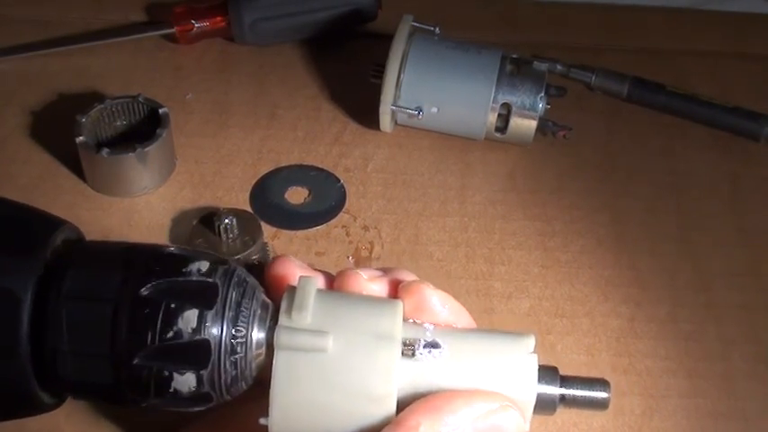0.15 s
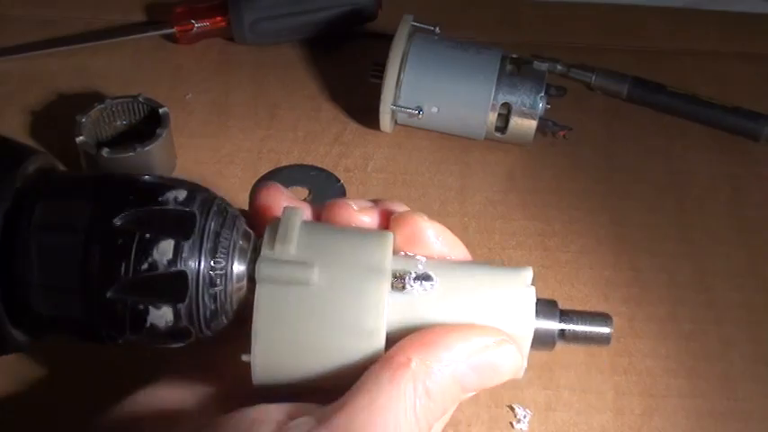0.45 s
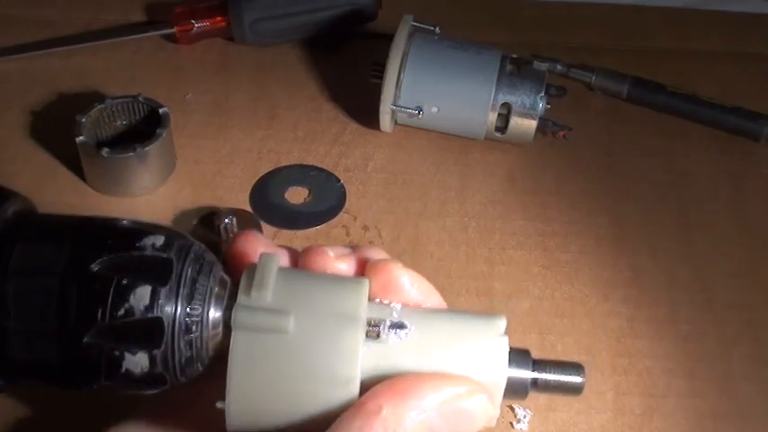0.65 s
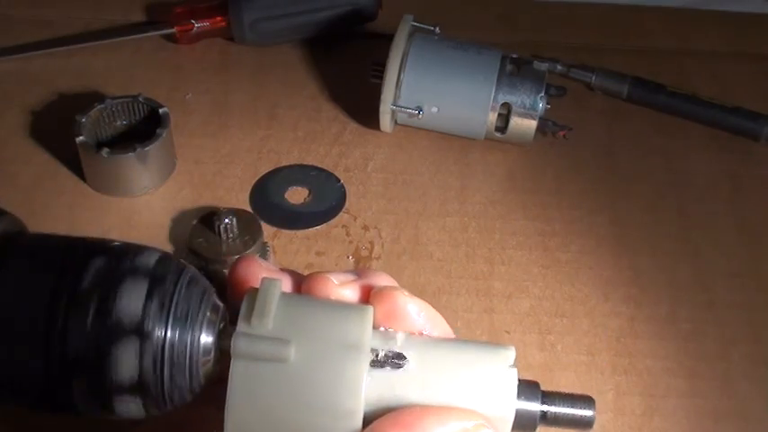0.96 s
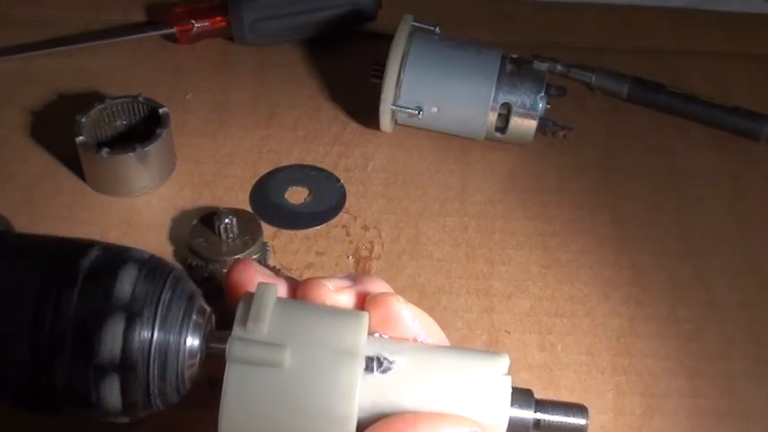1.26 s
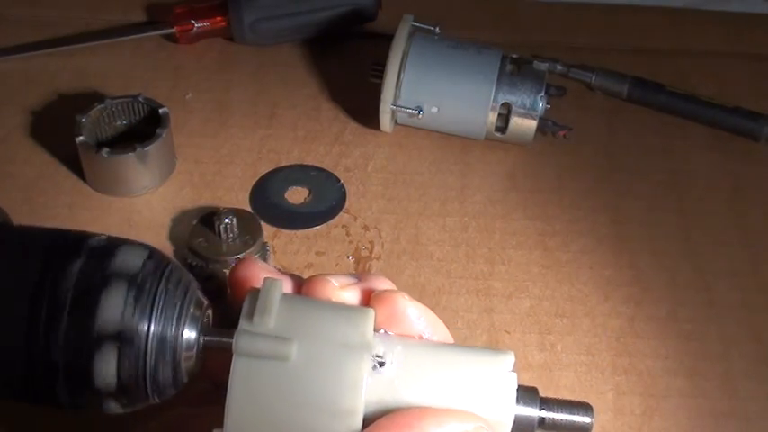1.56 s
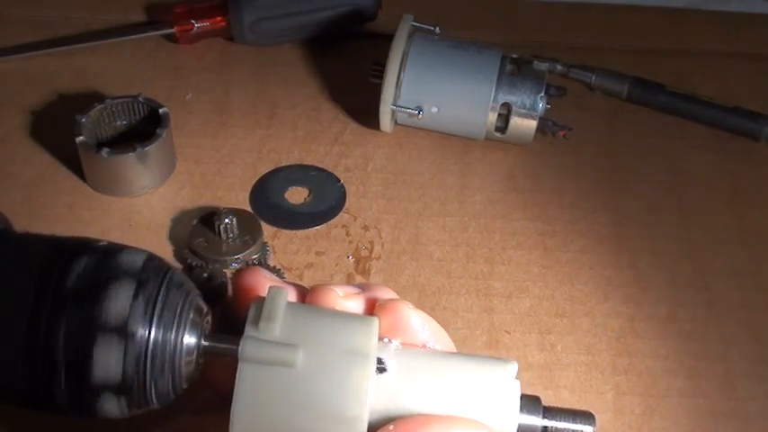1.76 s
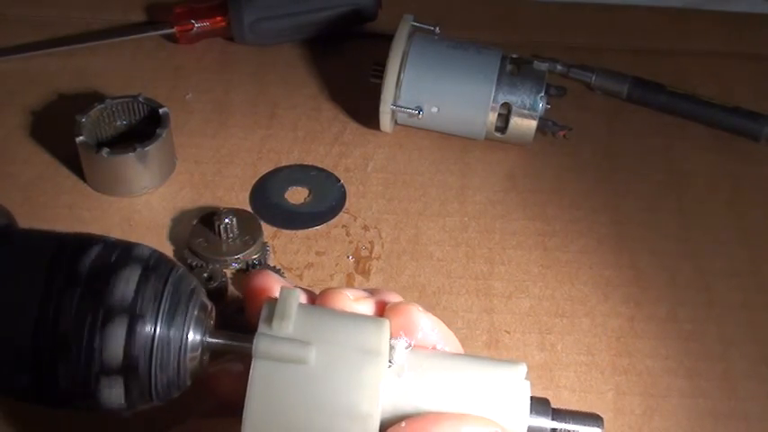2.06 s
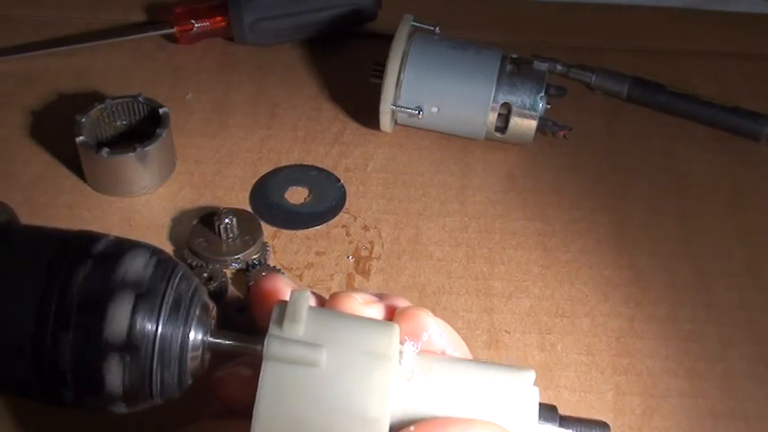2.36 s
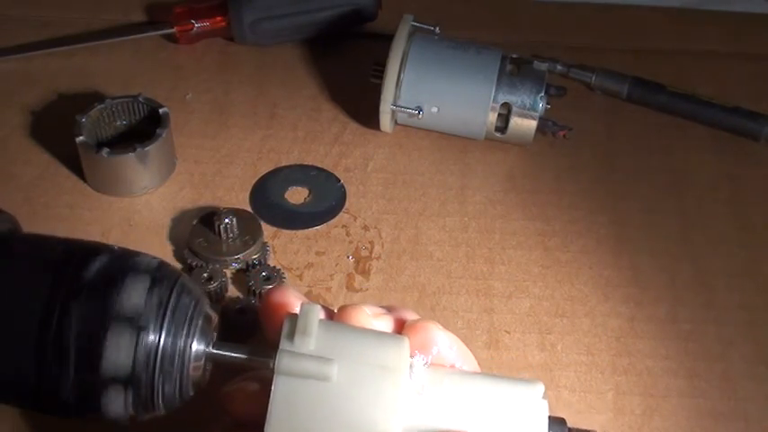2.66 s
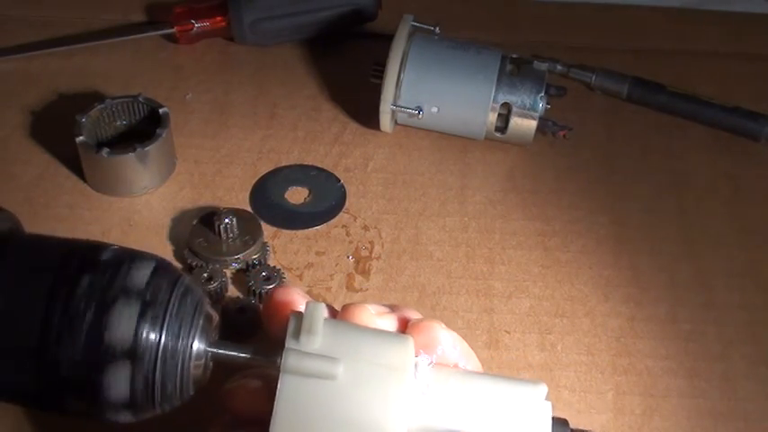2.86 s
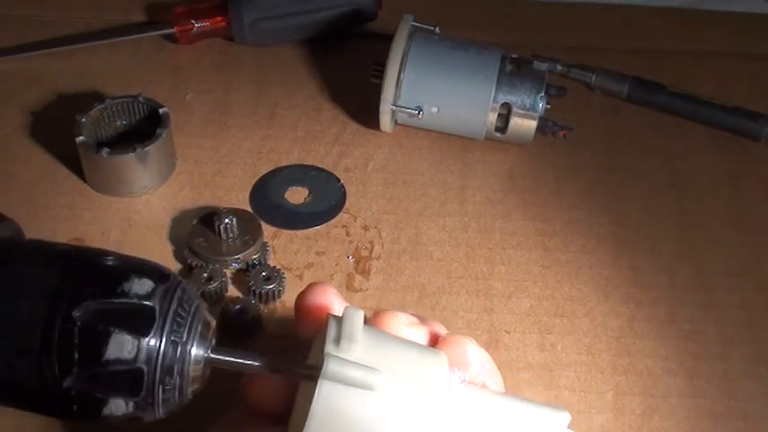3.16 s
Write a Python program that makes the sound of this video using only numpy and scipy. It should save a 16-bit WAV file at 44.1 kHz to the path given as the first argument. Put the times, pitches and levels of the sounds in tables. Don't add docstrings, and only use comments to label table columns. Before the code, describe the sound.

A cordless drill clicks, squeaks into a bright geared whine, then judders to a stop.

```python
import sys
import numpy as np
from scipy import signal
from scipy.fft import rfft, irfft
from scipy.io import wavfile

SR = 44100
rng = np.random.default_rng(int(sys.argv[2]) if len(sys.argv) > 2 else 0)


def gain_from_db(level_db):
    decades = np.asarray(level_db, float) / 20
    return 10 ** decades


def transcribe(u):
    v = np.clip(np.atleast_2d(u).T, -1, 1)
    q = np.round(v * 32767).astype(np.int16)
    wavfile.write(sys.argv[1], SR, q)


N = 145530

# f/Hz, level/dB
ROOM_TONE = [(18, -42), (30, -6), (355, 1.5), (437, 1), (569, 3), (866, -15), (1160, 0), (1500, -6.5),
             (16000, -16)]
# t/s, level/dB
RUB_LEVEL = [(0, -50), (.14, -51.5), (.23, -39.5), (.27, -43.5), (.3, -42.5), (.335, -35.5), (.37, -41.5),
             (.45, -50.5), (.5, -59), (.58, -58), (.6, -47), (.65, -60), (.7, -37)]
# f/Hz, density/dB
RUB_TONE = [(200, -19), (700, 0), (1500, -2), (3000, -4.5), (4500, -4.5), (7000, -3), (10000, -17),
            (15000, -31)]
# t/s, level/dB
CREAK_LEVEL = [(0, -64), (.31, -78), (.34, -74), (.45, -59), (.48, -75)]
# t/s, level/dB
SCRAPE_LEVEL = [(.28, -80), (.29, -39), (.315, -32.5), (.34, -44), (.4, -55), (.45, -80)]
# t/s, peak/dB, high over low ring/dB, t60/s, low ring f/Hz
CLICKS = [(0.0575, -19.5, -1.5, 0.0061, 1950), (.112, -39, 14, .012, 2500), (.155, -20, -21, 0.0086, 1960),
          (.160, -30, -16, 0.015, 2580), (.183, -25, 16, 0.011, 2520), (.214, -26, 15, .011, 2900),
          (.223, -27, 8, .01, 2200), (0.2455, -8, -2, 0.0062, 1940), (0.247, -15.5, -4, 0.016, 2430),
          (0.277, -20, 12, .008, 3200), (.284, -9, 10.5, 0.013, 3170), (0.2957, -14, 12, .012, 3000),
          (0.297, -20, 9, 0.013, 3100), (0.303, -18, 4, 0.033, 3060), (.313, -20, 7, .02, 1610),
          (.317, -23, 3, 0.018, 1180), (.329, -24, 1, 0.013, 1920), (.455, -35, -20, .014, 2200),
          (0.5175, -23, 2, .01, 3000), (.523, -18.5, 9.5, 0.022, 2370), (.527, -22.5, 8, 0.018, 1990),
          (0.539, -26, 5, .02, 2150), (.590, -11, 4.5, 0.011, 2350), (0.646, -33, -4, .02, 1800),
          (0.679, -15, -3.5, 0.011, 2130), (.687, -21, 2, 0.014, 3200), (.701, -18, -5, .014, 3250),
          (.706, -8.5, -2.5, 0.0034, 2220), (.718, -12.5, 0, 0.012, 2090), (3.250, -34, -10, .01, 1700),
          (3.257, -30, -2, .01, 2000), (3.278, -37, -14, .02, 1320)]
# f/Hz, density/dB
DULL_SNAP = [(400, -45), (1000, -20), (1600, -4), (2300, 0), (3200, -4), (4500, -12), (8000, -28)]
# f/Hz, density/dB
SHARP_SNAP = [(2500, -28), (4200, -5.5), (5600, -3), (7200, -3), (9000, -7), (12000, -23), (15500, -25)]
# multiple of low ring f, level/dB
LOW_RING = [(.53, -6), (.8, -2.5), (1.001, 3), (1.35, -6.5)]
# f/Hz, level/dB
HIGH_RING = [(4500, -16), (5800, -4), (6500, -3), (7100, 0), (7900, -3), (9400, -10), (11000, -18)]
# t/s, peak/dB, f/Hz
THUDS = [
    (.2455, -25.5, 450),
    (.2455, -23.5, 1040),
    (.669, -39, 320),
    (.680, -21, 1190),
    (3.250, -41, 795),
]
# t/s, f/Hz
SHAFT_SPEED = [(.72, 30), (.755, 100), (.775, 150), (.79, 192), (.81, 219), (.85, 247.5), (.885, 264.5),
               (.92, 273), (.97, 279.8), (1.03, 284.4), (1.14, 287.1), (1.45, 286.4), (1.86, 284.1),
               (2.2, 285.4), (2.6, 288.7), (2.92, 290), (3.105, 289.5), (3.15, 277)]
# t/s, level/dB
MOTOR_POWER = [(.70, -51), (.72, -11), (.745, -9.5), (.762, 0.5), (.78, 3), (.9, 0.5), (1.1, 1.5),
               (3.16, 0.5), (3.18, -6), (3.2, -13.5), (3.24, -28), (3.3, -51)]
# cutting level/dB, free level/dB
SHAFT_ORDERS = [(-24, -25), (-30, -28), (-22, -21), (-26, -25), (-38, -32), (-33, -38), (-48, -46),
                (-44, -46), (-35, -36), (-52, -54), (-50, -43), (-20, -19), (-35, -35), (-42, -44),
                (-37, -42), (-35, -39), (-46, -41), (-46, -36), (-44, -42), (-36, -29), (-17, -14),
                (-16, -24), (-20, -11), (-7, -6), (-12, -16), (-16, -27), (-14, -18),
                (-25, -29), (-30, -31), (-31, -28), (-29, -37), (-30, -50), (-35, -33), (-40, -39),
               (-36, -30), (-34, -40), (-38, -30), (-42, -34), (-33, -42), (-45, -36), (-38, -41),
               (-38, -41), (-37, -43), (-41, -46), (-52, -48), (-40, -44), (-39, -52), (-43, -49),
               (-52, -60), (-42, -54), (-47, -50), (-58, -51), (-52, -55), (-66, -61)]
MESH_ORDERS = [2.615, 5.23, 13.83, 14.83, 15.83, 21.23, 22.23, 22.77]
# cutting level/dB, free level/dB
MESH_LEVELS = [(-31, -39), (-28, -44), (-27, -36), (-22, -28), (-33, -37), (-27, -38), (-17, -22),
               (-27, -36)]
# t/s, level/dB
SLOT_SWELL = [(.8, -20), (.9, -1), (1.5, -4), (1.68, -10), (1.95, -3), (2.14, -16), (2.4, -1), (3.12, 1),
              (3.15, -2), (3.17, -25)]
# t/s, level/dB
WOBBLE_SWELL = [(1.75, 0), (1.95, -7), (2.3, -5), (2.8, 3)]
# t/s, level/dB
RING_GEAR_SWELL = [(1.6, -6), (1.75, 1), (2.1, -1), (2.6, -8)]
# f/Hz, density/dB
SHELL_TONE = [(60, -87), (300, -22), (1300, -7.5), (2200, -6.5), (3100, -14), (9000, -7.5), (11500, -19.5),
              (15500, -27)]
# f/Hz, width/Hz, level/dB
SHELL_HUMPS = [(797, 7.7, 0.44), (3976, 334, 9), (6533, 1390, 10), (14500, 860, 2.5)]
# t/s, peak/dB, t60/s
CLACKS = [
    (3.210, -12, 0.0071),
    (3.264, -13.5, 0.0072),
]
# f/Hz, density/dB
STEEL_SNAP = [(800, -19.5), (2600, 0.5), (4200, -13), (6000, 2.5), (7400, -1), (8800, -21), (14000, -30)]
# f/Hz, level/dB
ECHO_TONE = [(100, -39), (300, -26), (800, -1), (2800, -3), (5500, -12), (9000, -2.5), (14000, 1)]
# f/Hz, left over right level/dB
LEAN = [(200, 0), (400, .2), (800, 2), (1500, 3), (3000, 4.2), (6000, 4.8), (9500, 2.8), (13000, 0)]

BRAKE_S = 3.156
POLE, SLOT, WOBBLE, RING_GEAR = 3, 12, 2, 5.23
BURST_S = np.arange(4096) / SR


def evened(x):
    return x / np.sqrt(np.mean(x ** 2) + 1e-20)


def read(points, hz):
    f, value = np.transpose(points)
    return np.interp(np.log(hz + 1), np.log(f + 1), value)


def curve(points):
    return np.interp(np.arange(N) / SR, *np.transpose(points))


def colour(x, db_of):
    return irfft(rfft(x) * gain_from_db(db_of(np.fft.rfftfreq(N, 1 / SR))), N)


def band(x, centre_hz, width_hz):
    return evened(colour(x, lambda hz: np.maximum(-6 * ((hz - centre_hz) / width_hz) ** 2, -60)))


def drift(rate_hz):
    knots = rng.standard_normal(400)
    return np.interp(np.arange(N) * rate_hz / SR, np.arange(400), knots)


def snap(points, noise):
    hz = np.fft.rfftfreq(len(noise), 1 / SR)
    return evened(irfft(rfft(noise) * gain_from_db(read(points, hz)), len(noise)))


def fall(t60_s):
    rise_s, tail_db, tail_t60_s = 0.00047, -26, 0.09
    decay = gain_from_db(-60 * BURST_S / max(t60_s, 0.004))
    rattle = gain_from_db(tail_db - 60 * BURST_S / tail_t60_s)
    return np.minimum(BURST_S / rise_s, 1) * (decay + rattle)


def add(mix, start_s, peak_db, sound):
    part = mix[round(start_s * SR):][:len(sound)]
    part += (gain_from_db(peak_db) * sound / abs(sound).max())[:len(part)]


def room_tone():
    mid, side = colour(rng.standard_normal((2, N)), lambda hz: read(ROOM_TONE, hz))
    return gain_from_db(-52) * evened(np.array([mid + 0.05 * side, mid - 0.05 * side]))


def rub():
    creak_hz, creak_width_hz, creak_db = 1670, 70, 11
    grains = rng.standard_normal(N) * gain_from_db(3.0 * drift(350) + 1.5 * drift(40))
    slide = evened(colour(grains, lambda hz: read(RUB_TONE, hz)))
    out = gain_from_db(curve([*RUB_LEVEL, (0.8, -75)])) * slide
    out += gain_from_db(creak_db + curve(CREAK_LEVEL)) * band(grains, creak_hz, creak_width_hz)
    return out + gain_from_db(curve(SCRAPE_LEVEL)) * snap(SHARP_SNAP, grains)


def ring(modes):
    out = np.zeros(len(BURST_S))
    for hz, db in modes:
        level, pitch, phase = rng.standard_normal(3)
        turn = 2 * np.pi * hz * (1 + 0.024 * pitch) * BURST_S + np.pi * phase
        out += gain_from_db(db + 2 * level) * np.sin(turn)
    return evened(out)


def clicks():
    out, crack_db = np.zeros(N), -1
    for start_s, peak_db, sharp_db, t60_s, hz in CLICKS:
        dull, sharp = rng.standard_normal((2, len(BURST_S)))
        low = gain_from_db(crack_db) * snap(DULL_SNAP, dull) + ring([(k * hz, db) for k, db in LOW_RING])
        high = gain_from_db(crack_db) * snap(SHARP_SNAP, sharp) + ring(HIGH_RING)
        both = gain_from_db(-sharp_db / 2) * low + gain_from_db(sharp_db / 2) * high
        add(out, start_s, peak_db, fall(t60_s) * both)
    return out


def thuds():
    out, t60_s = np.zeros(N), 0.014
    for start_s, peak_db, hz in THUDS:
        envelope = np.minimum(BURST_S * hz, 1) * gain_from_db(-60 * BURST_S / t60_s)
        add(out, start_s, peak_db, np.sin(2 * np.pi * hz * BURST_S) * envelope)
    return out


def shell_db(hz):
    humps_db = sum(db * np.exp(-((hz - f) / width) ** 2) for f, width, db in SHELL_HUMPS)
    return read(SHELL_TONE, hz) + humps_db


def pole_db(hz, speed):
    boom_hz, boom_width_hz, boom_db = 730, 60, 7
    notch_hz, notch_width_hz, notch_db = 812, 22, -13
    strain_db = 15
    boom = boom_db * np.exp(-((hz - boom_hz) / boom_width_hz) ** 2)
    notch = notch_db * np.exp(-((hz - notch_hz) / notch_width_hz) ** 2)
    return boom + notch + strain_db * (1 - speed)


def drill():
    brake_hz_per_s, free_from_s, free_at_s = 5700, 2.17, 2.49
    spin_db, blur_db, slot_blur_db = 10, 30, 65
    waver_db, waver_hz, upper_db, bite_full_db = 1.3, 7, 2.5, 7
    lines_db, grind_db, eased_db, labour_db = -14.5, -22, -2.5, 5
    gate, chatter_db, chatter_hz = 0.23, 1.1, 110

    t = np.arange(N) / SR
    hz = np.maximum(curve(SHAFT_SPEED) - brake_hz_per_s * np.maximum(t - BRAKE_S, 0), 20)
    turns = np.cumsum(hz) / SR
    free = np.clip((t - free_from_s) / (free_at_s - free_from_s), 0, 1)
    top_hz = hz.max()
    coarse = slice(0, N, 64)
    speed = hz[coarse] / top_hz
    swell_db = {SLOT: curve(SLOT_SWELL), WOBBLE: curve(WOBBLE_SWELL), RING_GEAR: curve(RING_GEAR_SWELL)}
    bite_db = bite_full_db * np.clip((t - BRAKE_S) / 0.008, 0, 1)
    bite_share = {POLE: 1, 2 * POLE: 2}

    lines = np.zeros(N)
    orders = [*range(1, 55), *MESH_ORDERS]
    levels = [*SHAFT_ORDERS, *MESH_LEVELS]
    for k, (cut_db, free_db) in zip(orders, levels):
        line_hz = k * hz[coarse]
        slope_db = spin_db + blur_db * (k > 4.5) + slot_blur_db * (k % SLOT == 0)
        moved_db = shell_db(line_hz) - shell_db(k * top_hz) + slope_db * np.log10(speed)
        if k == POLE:
            moved_db = moved_db + pole_db(line_hz, speed)
        db = cut_db + (free_db - cut_db) * free + np.interp(t, t[coarse], moved_db)
        db = db + waver_db * drift(waver_hz) + swell_db.get(k, 0)
        db = db + bite_share.get(k, 0) * bite_db + upper_db * (k > 28)
        lines += gain_from_db(db) * np.sin(2 * np.pi * (k * turns + rng.random()))

    pulse = (1 + gate * np.cos(2 * np.pi * turns)) * gain_from_db(chatter_db * drift(chatter_hz))
    grind = evened(colour(pulse * rng.standard_normal(N), shell_db))
    load_db = grind_db + eased_db * free + labour_db * (1 - hz / top_hz)
    return gain_from_db(curve(MOTOR_POWER)) * (np.sqrt(2) * gain_from_db(lines_db) * lines + gain_from_db(load_db) * grind)


def squeak():
    start_s, rise_s, hold_s, t60_s = 0.718, 0.003, 0.009, 0.06
    pitch_hz, sag_per_s, rough_rad, level_db, half_db = 4320, 1.2, 0.9, -17, -15
    t = np.maximum(np.arange(N) / SR - start_s, 0)
    turn = 2 * np.pi * pitch_hz * t * (1 - sag_per_s * t) + rough_rad * drift(350)
    tone = np.sin(turn) + gain_from_db(half_db) * np.sin(turn / 2)
    decay = gain_from_db(level_db - 60 * np.maximum(t - hold_s, 0) / t60_s)
    return tone * np.minimum(t / rise_s, 1) * decay


def braking():
    judder_hz, judder_db, judder_t60_s = 1090, -24.5, 0.21
    shell_ring_hz, shell_ring_width_hz, shell_ring_db, shell_ring_t60_s = 6860, 500, -13, 0.12
    t = np.maximum(np.arange(N) / SR - BRAKE_S, 0)
    noise = rng.standard_normal(N)
    judder = evened(colour(noise, lambda hz: -30 * np.log10((hz + 1) / judder_hz) ** 2))
    shell_ring = band(rng.standard_normal(N), shell_ring_hz, shell_ring_width_hz)
    out = judder * np.minimum(t / 0.0036, 1) * gain_from_db(judder_db - 60 * t / judder_t60_s)
    return out + shell_ring * np.minimum(t / 0.004, 1) * gain_from_db(shell_ring_db - 60 * t / shell_ring_t60_s)


def clacks():
    out = np.zeros(N)
    for start_s, peak_db, t60_s in CLACKS:
        burst = fall(t60_s) * rng.standard_normal(len(BURST_S))
        add(out, start_s, peak_db, snap(STEEL_SNAP, burst))
    return out


def walls(x):
    level_db, t60_s, gap_s = -8.5, 0.085, 0.003
    t = np.arange(SR // 2) / SR
    tail = rng.standard_normal((2, len(t))) * gain_from_db(-60 * t / t60_s) * (t > gap_s)
    wet = signal.fftconvolve(x[None], tail / np.linalg.norm(tail[0]), axes=1)[:, :N]
    return gain_from_db(level_db) * colour(wet, lambda hz: read(ECHO_TONE, hz))


def scene():
    near = rub() + clicks() + thuds() + drill() + squeak() + braking() + clacks()
    both = near + walls(near)
    left = colour(both[0], lambda hz: read(LEAN, hz) / 2)
    right = colour(both[1], lambda hz: -read(LEAN, hz) / 2)
    return np.array([left, right]) + room_tone()


def top_cut(x):
    return signal.sosfilt(signal.butter(12, 16480, fs=SR, output="sos"), x)


def record(dry):
    ceiling, edge_hz, edge_width_hz = 0.86, 15400, 250

    def edges_db(hz):
        return -40 / (1 + np.exp((edge_hz - hz) / edge_width_hz)) - 12 / (1 + (hz / 60) ** 2)

    held = ceiling * np.tanh(dry / ceiling)
    return top_cut(colour(held, edges_db))


dry = scene()
out = record(dry)
transcribe(out)
```